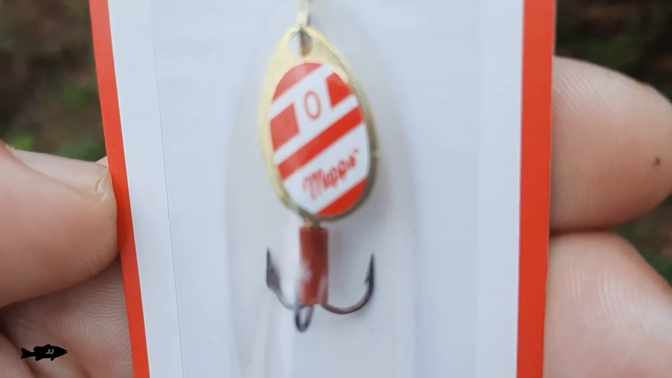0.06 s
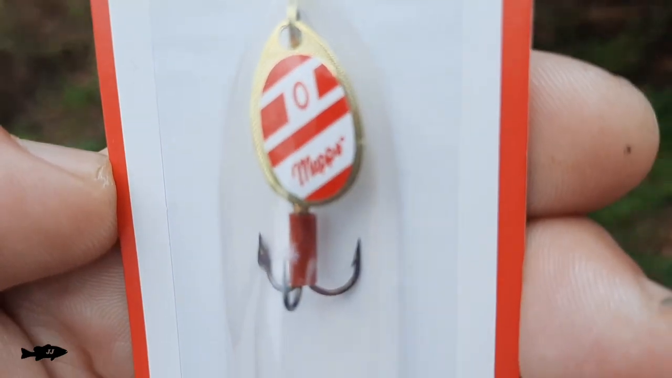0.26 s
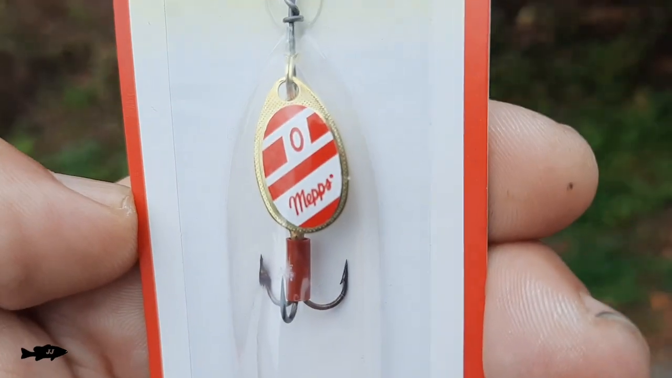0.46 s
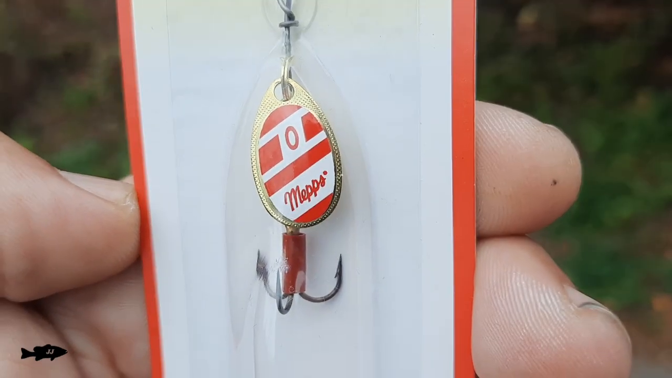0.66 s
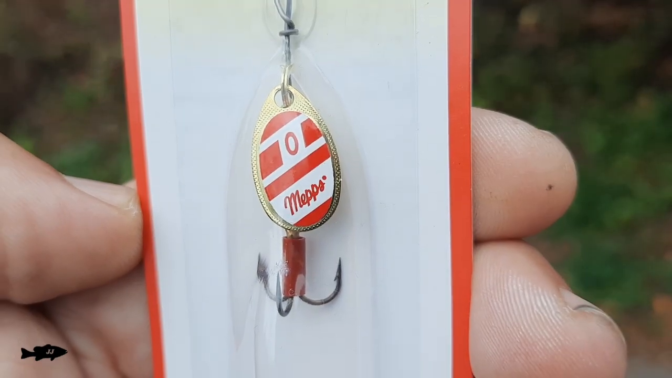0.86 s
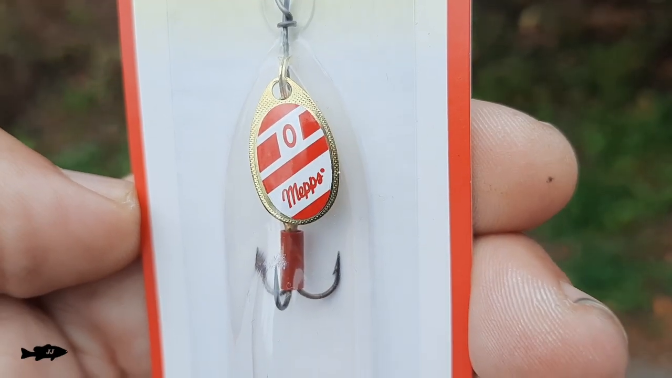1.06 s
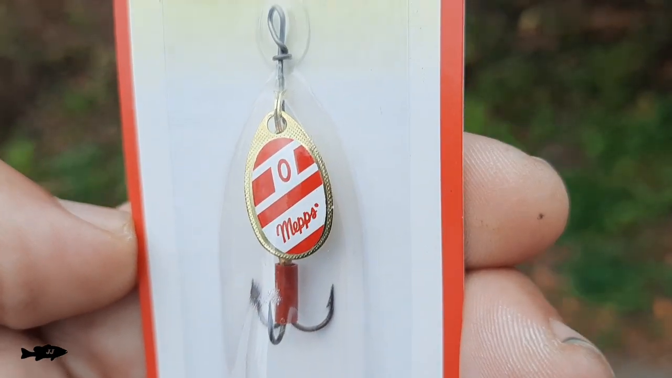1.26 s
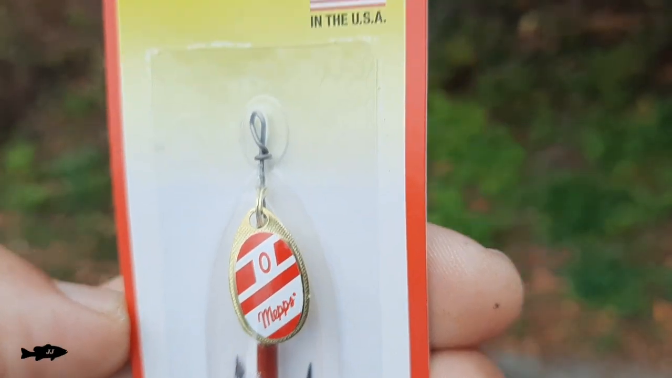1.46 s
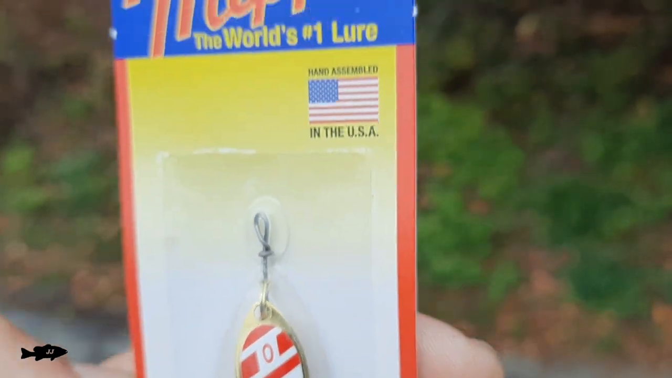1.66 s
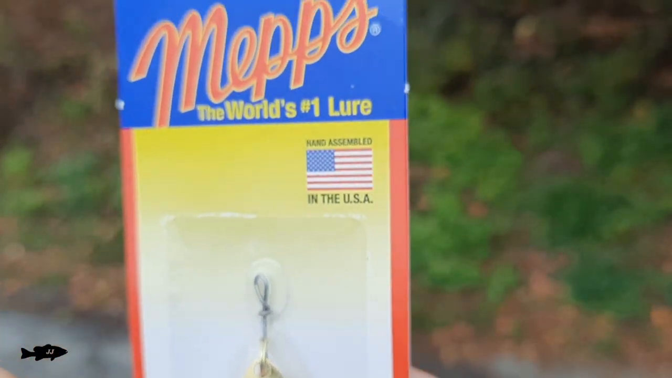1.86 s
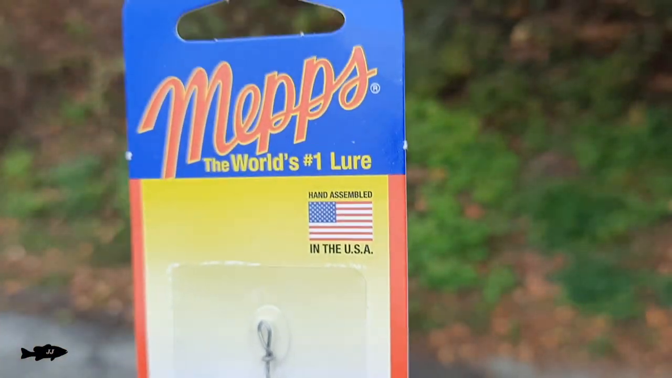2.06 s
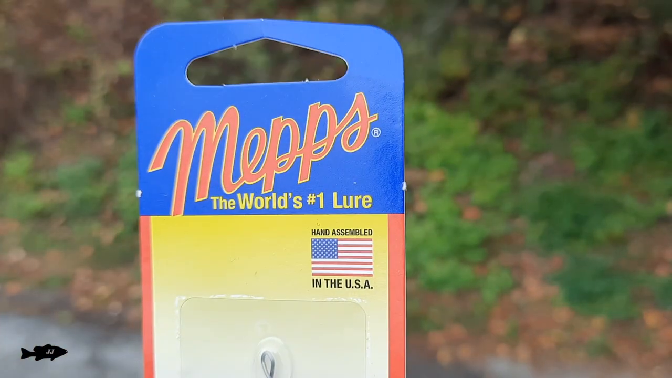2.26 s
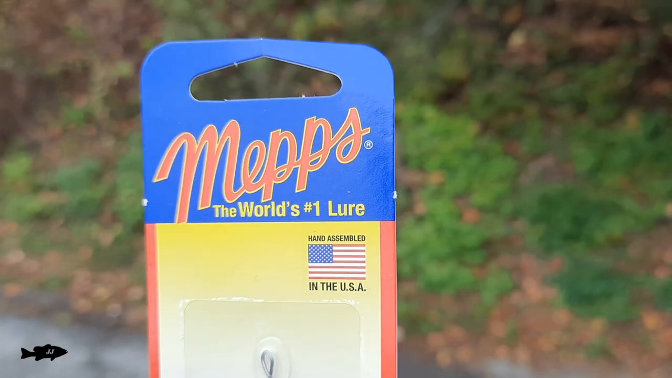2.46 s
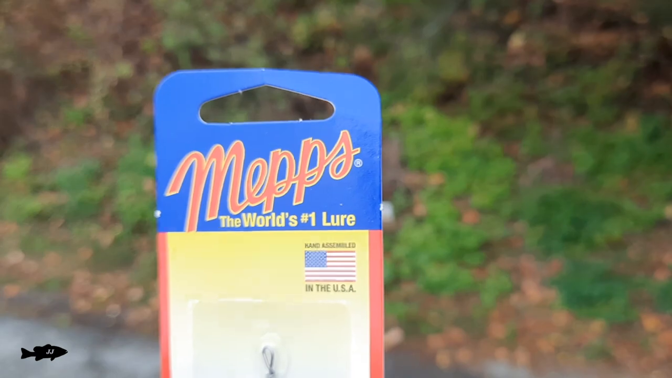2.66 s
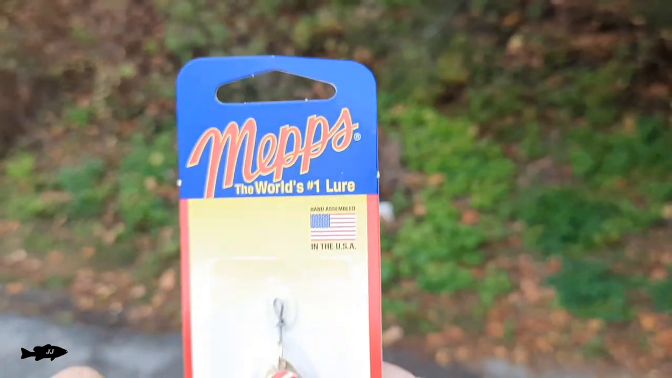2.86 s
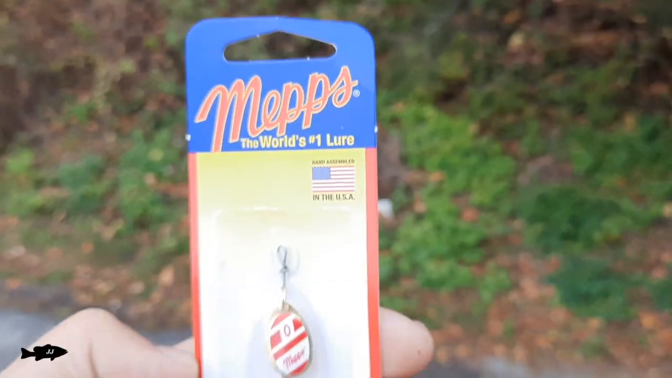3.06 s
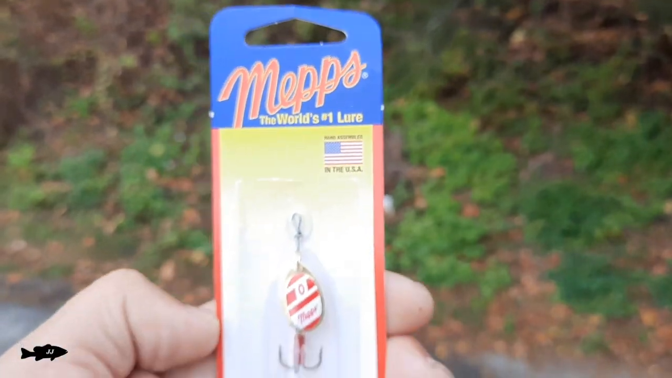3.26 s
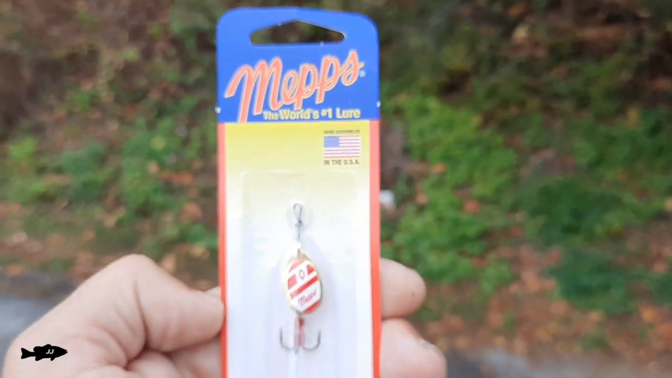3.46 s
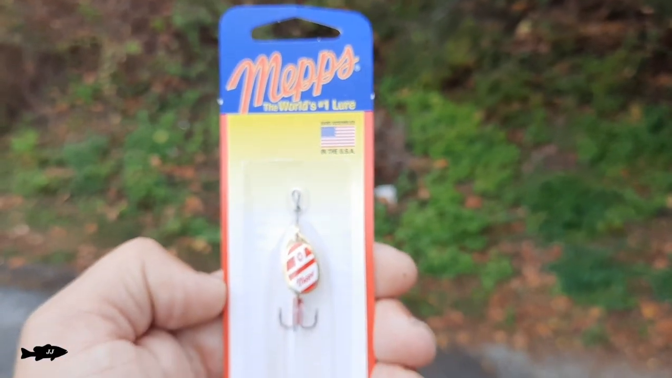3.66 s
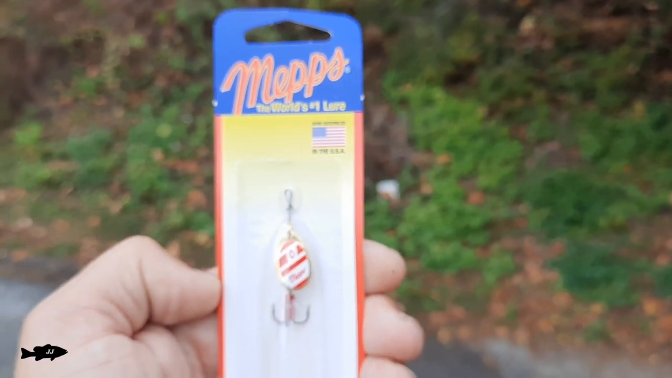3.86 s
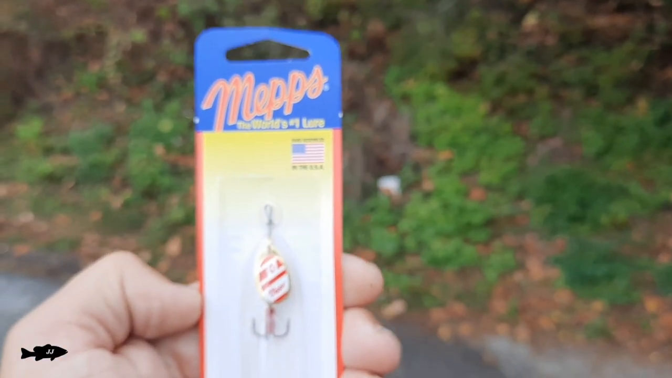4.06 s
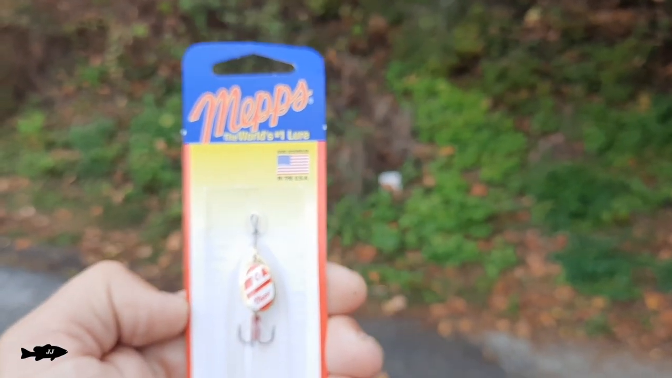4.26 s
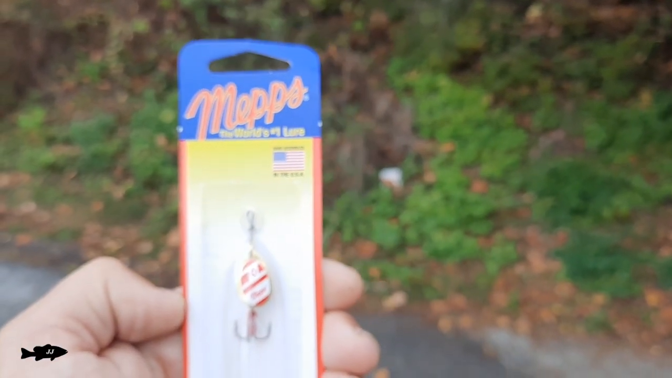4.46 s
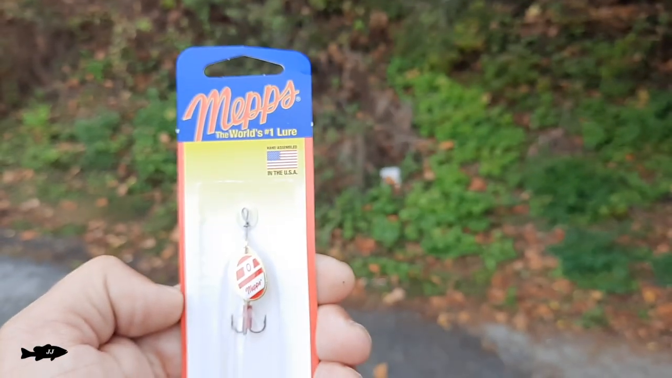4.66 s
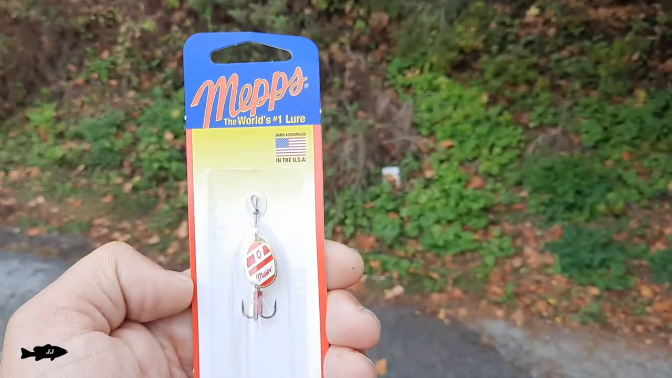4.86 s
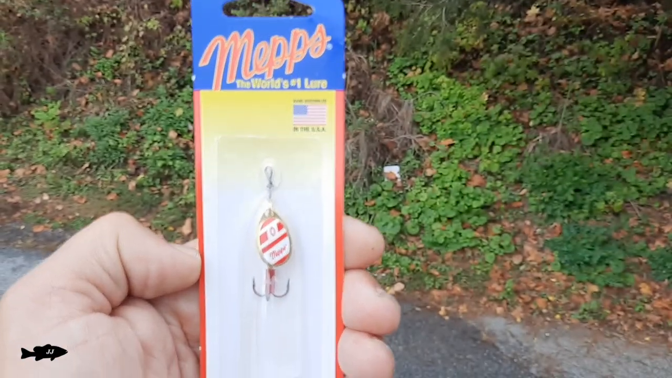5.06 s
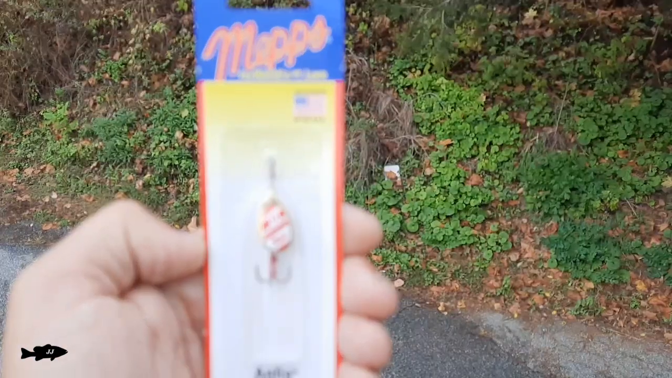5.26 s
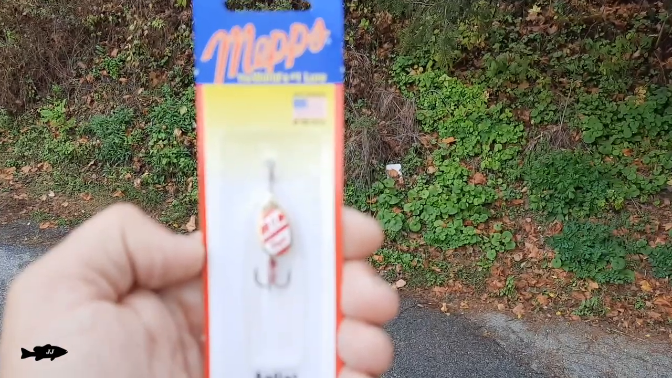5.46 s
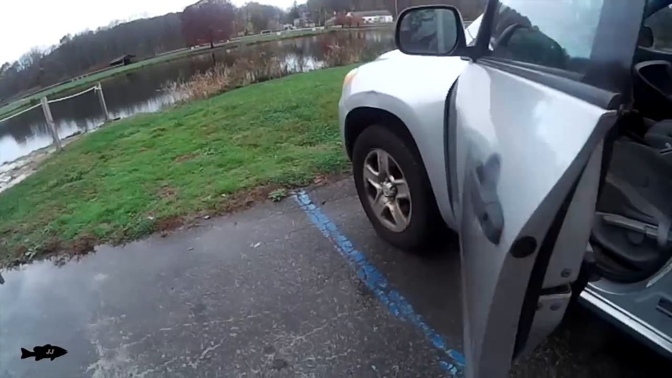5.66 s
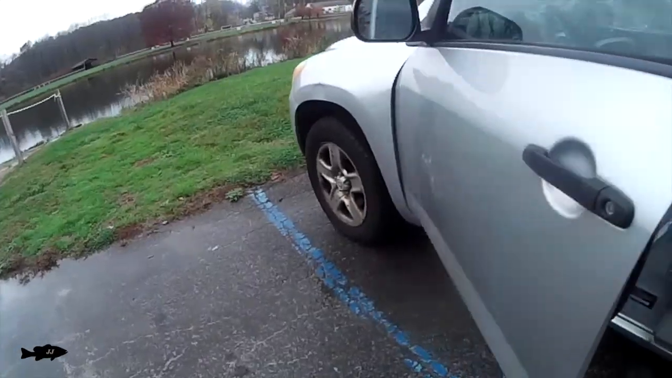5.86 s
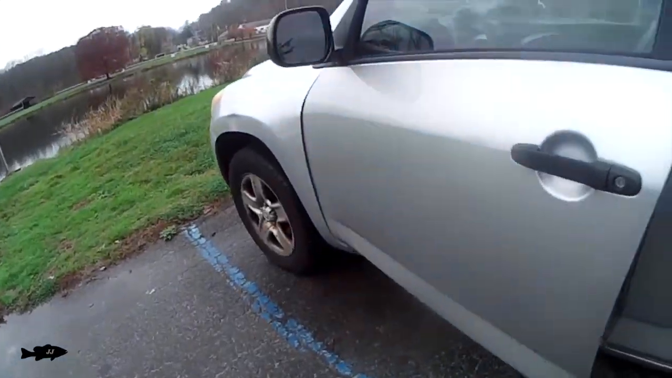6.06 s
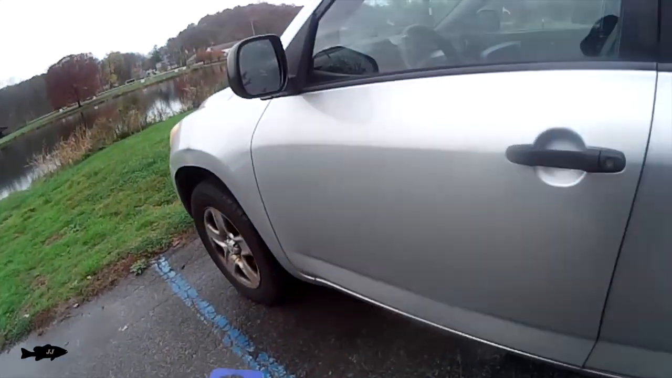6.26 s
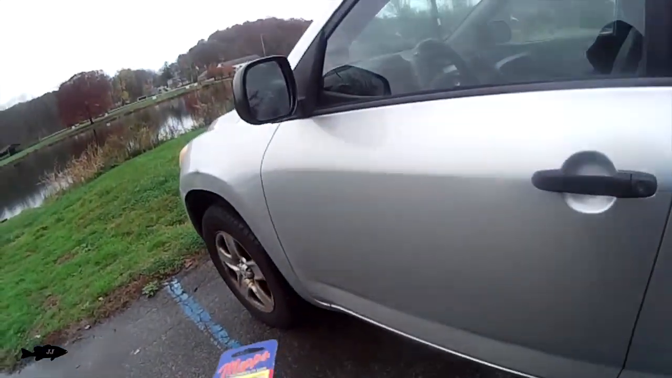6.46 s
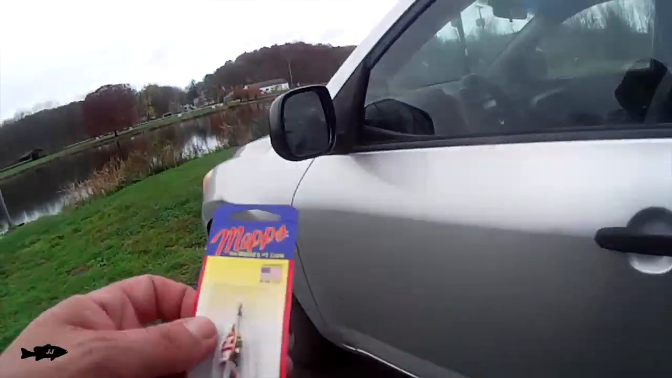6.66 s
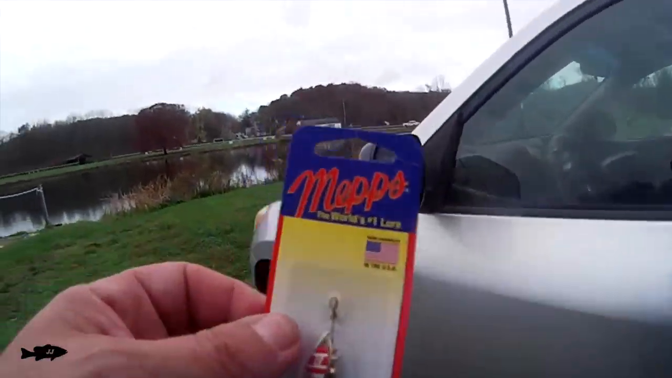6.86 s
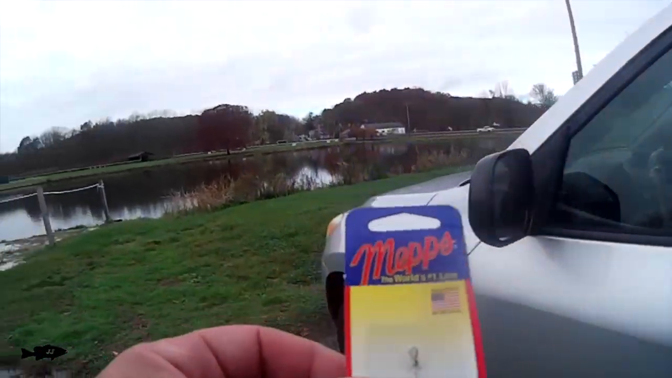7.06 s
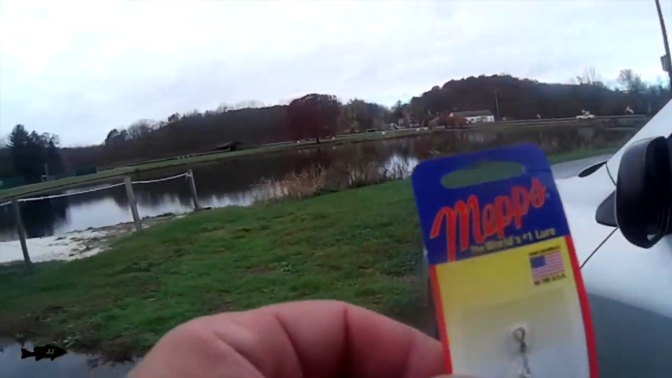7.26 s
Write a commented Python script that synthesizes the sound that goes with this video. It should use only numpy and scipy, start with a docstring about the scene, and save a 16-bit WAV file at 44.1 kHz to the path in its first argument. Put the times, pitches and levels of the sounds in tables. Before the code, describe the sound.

Tyre roar rises, passes and fades over quiet insects; abruptly, duller air, a snapping plastic packet, and one solid car door slam close by.

```python
"""Roadside pass-by, then a car door

Crickets sing at a roadside while a car passes on the right: coloured noise makes rumble, tyre roar and hiss,
blurred tones make hum, exhaust boom, drone and whine, all sinking in pitch by Doppler and a steady sag.
At SWITCH_S the scene becomes a lakeside car park through one small microphone: far traffic wash, air bumps,
a plastic packet of damped modes and stick-slip rubs, and a door shutting with knocks, clicks and panel ring."""
import sys
import numpy as np
from scipy import signal
from scipy.fft import rfft, irfft, next_fast_len
from scipy.io import wavfile
from scipy.ndimage import map_coordinates

SR = 44100
rng = np.random.default_rng(int(sys.argv[2]) if len(sys.argv) > 2 else 0)


def file_out(sig):
    """Save sig as 16-bit WAV at sys.argv[1]."""
    # one column per channel
    cols = np.atleast_2d(sig).T
    # limit, then scale
    lim = np.clip(cols, -1, 1)
    pcm = np.round(lim * 32767).astype(np.int16)
    wavfile.write(sys.argv[1], SR, pcm)


N = 322659
T = np.arange(N) / SR


def amp(db):
    """Decibels to gain."""
    return 10 ** (np.asarray(db) / 20)


def unit(x):
    """Scale to rms 1."""
    return x / np.sqrt(np.mean(x ** 2) + 1e-20)


def along(points, hz):
    """Interpolate (Hz, value) points on a log-frequency axis."""
    f, v = np.transpose(points)
    return np.interp(np.log(hz + 1), np.log(f + 1), v)


def curves(rows):
    """One value per sample for each column after the time."""
    s, *cols = np.transpose(rows)
    return [np.interp(T, s, c) for c in cols]


def wobble(knots_per_s):
    """A smooth random curve through normally distributed knots."""
    knots = rng.standard_normal(int(N * knots_per_s / SR) + 4)
    return map_coordinates(knots, [T * knots_per_s])


def filtered(x, response):
    """Multiply the spectrum of x by a function of frequency in Hz."""
    n = x.shape[-1]
    m = next_fast_len(n + SR // 4)
    return irfft(rfft(x, m) * response(np.fft.rfftfreq(m, 1 / SR)), m)[..., :n]


def noise(spectrum, size=N, tilt_db=0):
    """Noise of rms 1 with the given colour, tilted in dB per octave."""
    colour = lambda hz: amp(along(spectrum, hz) + tilt_db * np.log2(hz + 1))
    return unit(filtered(rng.standard_normal(size), colour))


def fade(t, t60):
    """Free decay, 60 dB in t60 seconds."""
    return np.exp(-np.log(1000) * t / t60)


def add(track, s, sound):
    """Mix a sound into the track from time s."""
    part = track[round(s * SR):][:len(sound)]
    part += sound[:len(part)]


def swell(start, end, attack, release):
    """A gain that rises around start, holds, and falls around end."""
    rise = 1 + np.tanh((T - start) / (2 * attack))
    fall = 1 - np.tanh((T - end) / (2 * release))
    return rise * fall / 4


def touches(rows):
    """Brief Gaussian rises of gain, one for each (s, dB, length s) row."""
    return sum(amp(db) * np.exp(-((T - s) / length) ** 2) for s, db, length in rows)


def ringing(modes, t, scatter_db):
    """Damped modes of alternating sign, their levels drawn afresh each time."""
    out = 0
    for k, (hz, db, t60) in enumerate(modes):
        level = amp(db + rng.normal(0, scatter_db))
        out = out + (-1) ** k * level * fade(t, t60) * np.sin(2 * np.pi * hz * t)
    return out


def tone(hz, width_hz, flutter_db):
    """A tone blurred by a wandering phase and a fluttering level."""
    drift = np.cumsum(rng.standard_normal(N) * np.sqrt(2 * np.pi * abs(width_hz) / SR))
    lowpass = signal.butter(2, np.clip(2.2 * width_hz, 5, 2000), fs=SR, output="sos")
    smooth = signal.sosfilt(lowpass, np.exp(1j * drift))
    carrier = np.exp(2j * np.pi * np.cumsum(hz) / SR)
    return amp(flutter_db * wobble(24.99)) * (smooth * carrier).real


SWELL_EDGE_S = 0.035


def swelling(rows, hz, flutter_db):
    """A tone that comes and goes in swells, each with its own level and blur."""
    return sum(amp(db) * swell(start, end, SWELL_EDGE_S, SWELL_EDGE_S) * tone(hz, width_hz, flutter_db)
               for start, end, db, width_hz in rows)


PASS_S, SPEED_M_PER_S = 2.4, 9


def position():
    """Metres past the microphone on a straight course at constant speed."""
    return SPEED_M_PER_S * (T - PASS_S)


CLOSEST_M = 8.14


def bearing():
    """Sine of the angle to the car: towards -1 coming, 0 abreast, towards 1 going."""
    return position() / np.hypot(position(), CLOSEST_M)


LAG_MS, LAG_SWING_MS = 0.454, 0.035  # lag abreast; swing with bearing


def from_right(x):
    """A sound from the right reaches the left microphone later."""
    lag_samples = (LAG_MS - LAG_SWING_MS * bearing()) * SR / 1000
    return np.array([map_coordinates(x, [np.arange(N) - lag_samples], order=3), x])


def scattered(y, z, unlike_hz=760):
    """Noise from all sides: two spaced microphones agree only in the bass."""
    turn = lambda hz: np.arccos(np.sinc(hz / unlike_hz)) / 2
    mid, side = filtered(np.array([y, z]), lambda hz: np.array([np.cos(turn(hz)), np.sin(turn(hz))]))
    return np.array([mid + side, mid - side])


DIRECT_SHARE, OPEN_M = 0.36, 12.2  # power share heard straight when abreast; reach of that path


def road_noise(x, y, z):
    """Of three like noises, one comes straight from the car and two are scattered by the bank."""
    share = np.clip(DIRECT_SHARE * np.exp(-(position() / OPEN_M) ** 2), 0, 1)
    return np.sqrt(share) * from_right(x) + np.sqrt(1 - share) * scattered(y, z)


# Loudness of the pass. Each row: time in seconds, tyre roar and body rumble in dB before a fixed trim.
PASS_LOUDNESS = [(0.0, -61, -68.5), (0.55, -58, -66.5), (0.95, -50.5, -55.5), (1.4, -42.5, -48.5),
                 (1.75, -39.5, -50), (2.0, -38.0, -45), (2.25, -33, -40.5), (2.62, -35.5, -41.5),
                 (2.9, -37.0, -44), (3.25, -38.5, -44.5), (3.65, -40.5, -46), (4.15, -40, -47.5),
                 (4.65, -44, -55), (5.6, -48, -60)]
# Colours of body rumble, tyres from the front, tyres from the rear, hiss.
# Each row: frequency in Hz, relative density in dB per Hz.
RUMBLE_COLOUR = [(15, -42), (35, -25), (65, -1), (100, -1), (135, -1), (172, 0.5), (220, -3), (320, -2),
                 (600, -8), (2000, -86)]
TYRE_FRONT_COLOUR = [(100, -29), (250, -7), (330, 0.5), (470, -3), (610, -7.5), (790, 0), (930, -5),
                     (1150, -8.5), (1700, -10), (2150, -13.5), (3200, -28), (5000, -36.5), (12000, -48)]
TYRE_REAR_COLOUR = [(100, -50), (260, -0.5), (420, 4), (620, -10.5), (780, 5.5), (920, 0), (1150, 4),
                    (1400, -8), (1650, -5.5), (2700, -16), (3200, -22), (5000, -36.5), (9500, -54),
                    (15000, -48)]
HISS_COLOUR = [(800, -44), (2500, 11.5), (4200, 5.5), (5200, -2.5), (6250, 0), (7200, -6.5), (8400, -5),
               (9400, -16), (10800, -11.5), (13000, -19), (15500, -30)]
# Microphone mismatch. Each row: frequency in Hz, left minus right in dB.
MIC_MISMATCH = [(60, -2.5), (130, 0), (290, -1), (640, 5.5), (1410, -2.5), (3100, 0.5), (6820, 4.5),
                (15000, -1)]
REAR_AT_M, REAR_OVER_M = 3.8, 3.7  # centre and scale of the front-to-rear crossfade
HISS_PEAK_M, HISS_REACH_M = 1.3, 2  # hiss peaks this far past the microphone


def passing_car():
    """Rumble, roar and hiss follow the pass; hiss peaks just past it, roar shifts to its rear colour."""
    roar_db, rumble_db = curves(PASS_LOUDNESS)
    rear = (1 + np.tanh((position() - REAR_AT_M) / (2 * REAR_OVER_M))) / 2
    close = 1 / (1 + ((position() - HISS_PEAK_M) / HISS_REACH_M) ** 2)
    surface_db = .7 * wobble(8.2)  # uneven asphalt
    rumble = amp(rumble_db + 2.15 + 0.71 * wobble(7))
    roar = amp(roar_db + 0.3 + surface_db)
    hiss = amp(roar_db - 18.5 + 4.2 * close - 2.85 * rear + surface_db + 0.63 * wobble(30))

    def rush():
        tyres = np.sqrt(1 - rear) * noise(TYRE_FRONT_COLOUR) + np.sqrt(rear) * noise(TYRE_REAR_COLOUR)
        return rumble * noise(RUMBLE_COLOUR) + roar * tyres + hiss * noise(HISS_COLOUR)

    car = road_noise(rush(), rush(), rush()) + car_tones()
    return filtered(car, lambda hz: amp(along(MIC_MISMATCH, hz) * np.array([[.5], [-.5]])))


# Swells of tread hum, exhaust boom and engine drone.
# Each row: start in seconds, end in seconds, level in dB before blur and flutter, blur width in Hz.
HUM_SWELL_ROWS = [(2.003, 2.28, -32.5, 23.4), (2.42, 2.955, -37, 21.4), (3.05, 3.5, -45, 10.4),
                  (3.55, 4.54, -40, 0.61), (4.58, 5.7, -51.5, 1.5)]
BOOM_SWELLS = [(.88, 1.55, -56.5, 31), (1.83, 2.3, -44.5, 8.5), (2.45, 2.7, -39.5, 12),
               (2.92, 3.48, -47.5, 3.9)]
DRONE_SWELLS = [(2.0, 4.3, -53, 12.1), (4.72, 5.25, -51.5, 6)]
HUM_HZ, SAG_HZ_PER_S = 343, 2.4  # hum when abreast, and its steady sag
SOUND_M_PER_S = 343


def car_tones():
    """Tread hum, a moan on the approach, exhaust boom, drone and thin whine share one Doppler law and sag."""
    sag = 1 - SAG_HZ_PER_S * (T - PASS_S) / HUM_HZ
    pitch = sag / (1 + bearing() * SPEED_M_PER_S / SOUND_M_PER_S)
    hum = swelling(HUM_SWELL_ROWS, HUM_HZ * pitch, flutter_db=1.5)
    moan_gain = amp(-38.5) * swell(1.42, 1.83, attack=0.047, release=0.11)
    moan = moan_gain * tone(412 * pitch, width_hz=90, flutter_db=1.5)
    exhaust = swelling(BOOM_SWELLS, 68.5 * pitch, flutter_db=4.5)
    drone = swelling(DRONE_SWELLS, 177 * pitch, flutter_db=3.5)
    whine_gain = amp(-69) * swell(2.0, 2.7, attack=.04, release=0.15)
    whine = whine_gain * tone(8250 * pitch, width_hz=200, flutter_db=1.0)
    return from_right(hum + moan) * amp([[.6], [-.6]]) + from_right(exhaust + drone + whine)


# Roadside wash. Each row: frequency in Hz, relative density in dB per Hz.
FAR_TRAFFIC_COLOUR = [(15, -38), (25, -12), (79, 1), (309, -5), (354, -12), (604, -15), (790, 0.5),
                      (1150, -5.5), (1960, -9.5), (5140, -36.5), (5880, -34), (9270, -47), (12400, -37),
                      (15000, -55)]


def far_traffic():
    """A steady wash from distant roads, arriving from all sides."""
    return amp(-57.5) * scattered(noise(FAR_TRAFFIC_COLOUR), noise(FAR_TRAFFIC_COLOUR))


RATE_WANDER_SHARE, STROKE_WANDER_DB = .005, 1.5


def cricket(hz, rate, stroke_s, duty, sweep_hz, rough_hz):
    """Each wing stroke, one of them centred on stroke_s, rings one short note that arches in pitch."""
    strokes = np.cumsum(rate * (1 + RATE_WANDER_SHARE * wobble(3.3))) / SR
    phase = (strokes - np.interp(stroke_s, T, strokes) + duty / 2) % 1
    u = np.clip(phase / duty, 0, 1)  # progress through the stroke
    pitch = hz - sweep_hz * (2 * u - .85) ** 2 + rough_hz * wobble(250)
    notes = np.sin(np.pi * u) * np.sin(2 * np.pi * np.cumsum(pitch) / SR)
    return unit(notes) * amp(STROKE_WANDER_DB * wobble(16))


# Tree cricket trills. Each row: start in seconds, end in seconds, level in dB, time of one stroke in seconds.
TREE_TRILLS = [(-.2, 0.305, -81.5, .177), (.32, .41, -81, 0.34), (4.957, 5.04, -72, 5.019),
               (5.04, 5.46, -68, 5.229)]
TRILL_ATTACK_S, TRILL_RELEASE_S = 0.011, .008
TREE_STROKES_PER_S, NEAR_STROKES_PER_S, FAR_STROKES_PER_S = 23.8, 10.95, (10.2, 12.4)
NEAR_DB, FAR_DB = -79, -82.5  # FAR_DB: the first far one; the second is 4 dB lower
LEAVES_DB = -5.5  # scatter of the tree and near crickets


def crickets():
    """A tree cricket trills in bursts; ground crickets tick higher up, the far ones smeared by undergrowth."""
    tree = 0
    for start, end, db, stroke_s in TREE_TRILLS:
        gain = amp(db) * swell(start, end, TRILL_ATTACK_S, TRILL_RELEASE_S)
        tree = tree + gain * cricket(hz=3494, rate=TREE_STROKES_PER_S, stroke_s=stroke_s, duty=.72,
                                     sweep_hz=29.9, rough_hz=15)
    near = cricket(hz=6470, rate=NEAR_STROKES_PER_S, stroke_s=4.434, duty=0.25, sweep_hz=604, rough_hz=40)
    near = near * amp(NEAR_DB) * swell(2.3, 5.4, attack=.3, release=0.35)
    far = sum(amp(-4 * k) * cricket(hz=6035, rate=rate, stroke_s=0.98, duty=.4, sweep_hz=278, rough_hz=50)
              for k, rate in enumerate(FAR_STROKES_PER_S))
    far = far * amp(FAR_DB) * swell(0.34, 6.3, attack=0.46, release=.3)
    t = np.arange(SR // 4) / SR
    leaves = rng.standard_normal((2, len(t))) * fade(t, 0.06)
    leaves = leaves / np.linalg.norm(leaves[0])
    distant = far + amp(LEAVES_DB) * (tree + near)
    return tree + near + signal.fftconvolve(distant[None], leaves, axes=1)[:, :N]


# Colours of the lakeside wash and of the air bumps. Each row: frequency in Hz, relative density in dB per Hz.
LAKESIDE_COLOUR = [(15, -39), (25, -16), (59, -3.5), (193, -3.5), (233, 0), (267, -5), (368, -5.5),
                   (537, -12.5), (597, -11.5), (1750, -15.5), (2170, -27), (2550, -26), (3620, -32),
                   (12500, -36.5), (15500, -46)]
AIR_BUMP_COLOUR = [(10, -12), (28, 7.5), (60, -5), (110, -8), (200, -18), (600, -58), (2000, -90)]
# Air bumps on the moving microphone. Each row: centre in seconds, level in dB, length in seconds.
AIR_BUMPS = [(6.62, -51, 0.052), (6.812, -51, 0.024), (6.885, -50, 0.053), (7.04, -60, .04),
             (7.27, -54, 0.075)]


def lakeside_air():
    """Far traffic and faint hiss, with air bumping the microphone."""
    far = amp(-54.0 + 0.2 * wobble(3.0)) * noise(LAKESIDE_COLOUR)
    return far + touches(AIR_BUMPS) * noise(AIR_BUMP_COLOUR)


# Stiff plastic modes. Each row: frequency in Hz, relative level in dB before the snap's tilt, t60 in seconds.
PACKET_MODES = [(1670, 4, 0.014), (2020, -20, 0.013), (2700, -9, 0.014), (3930, -12, 0.013),
                (5360, -20, 0.011), (8400, -32, 0.0082)]
# Packet snaps. Each row: start in seconds, level in dB before tilt and rise, brightness in dB per octave.
PACKET_SNAPS = [(5.676, -40, -2.5), (5.965, -48, 1), (6.7075, -41, -1), (6.732, -47, 8.5),
                (6.8047, -30, -3)]
# Colour of snaps and rubs. Each row: frequency in Hz, relative density in dB per Hz.
PLASTIC_COLOUR = [(600, -28), (1300, 4), (1750, 14), (2300, -2), (3200, -2), (3900, -5), (5500, -12),
                  (8200, -11.5), (10000, -29), (14000, -37)]


def packet():
    """Stiff plastic snaps and rings for a moment, or scuffs under the fingers."""
    out, t = np.zeros(N), np.arange(SR // 10) / SR
    lowest_hz = PACKET_MODES[0][0]
    for s, db, bright_db in PACKET_SNAPS:
        ring = sum(amp(level + bright_db * np.log2(hz / lowest_hz)) * fade(t, t60) * np.sin(2 * np.pi * hz * t)
                   for hz, level, t60 in PACKET_MODES)
        crack = noise(PLASTIC_COLOUR, size=len(t), tilt_db=bright_db) * fade(t, 0.04)
        crack = amp(-10.0 + bright_db) * crack
        add(out, s, amp(db) * (ring + crack) * (1 - np.exp(-t / 0.00043)))
    return out + rubs()


# Finger rubs. Each row: centre in seconds, scuff level in dB, length in seconds, singing pitch in Hz.
FINGER_RUBS = [(5.69, -62, .005, 1750), (6.695, -60, 0.02, 2950), (6.719, -54, 0.0055, 4100),
               (6.781, -61, 0.005, 4050), (6.997, -63, 0.007, 3800), (7.024, -53, 0.014, 3900)]
SLIPS_PER_S, SING_WIDTH_HZ, SING_DB = 5000, 450, -4.5  # SING_DB: relative to the scuff


def rubs():
    """Fingers stick and slip on the packet: a fine crackle that sings at the pitch of the spot they touch."""
    out = np.zeros(N)
    for s, db, length, sing_hz in FINGER_RUBS:
        slips = rng.standard_normal(N) * (rng.random(N) < SLIPS_PER_S / SR)
        scuff = unit(filtered(slips, lambda hz: amp(along(PLASTIC_COLOUR, hz))))
        resonance = lambda hz: 1j * hz / (sing_hz ** 2 - hz ** 2 + 1j * hz * SING_WIDTH_HZ)
        sing = unit(filtered(slips, resonance))
        out += touches([(s, db, length)]) * (scuff + amp(SING_DB) * sing)
    return out


# Door contacts: seal, latch, striker, frame, seal squeezed, striker again, rebound, latch settling, rattle.
# Each row: start in seconds, panel, knock and metal click drive in dB, rise in seconds.
DOOR_CONTACTS = [(6.290, -25.5, -26, -36, 0.0016), (6.304, -49, -45, -29.5, 0.0018),
                 (6.3135, -18, -9.5, -23.5, 0.0008), (6.3234, -25, -21, -33, 0.00067),
                 (6.338, -20, -26, -36, 0.0014), (6.3432, -14.5, -6, -24.5, 0.00081),
                 (6.379, -16.5, -23, -31, 0.0031), (6.390, -23, -20, -37, .001),
                 (6.461, -28, -34, -37, 0.0067)]
# Door panel and window modes, then the dead knock of striker and frame.
# Each row: frequency in Hz, relative level in dB, t60 in seconds.
PANEL_MODES = [(125, -1, 0.36), (172, -0.5, 0.25), (202, -3.5, 0.3), (266.6, -0.5, 0.34),
               (293.6, 0.5, 0.32), (344, 0, 0.38), (357, -6, 0.34), (382, -9, 0.51), (445, -6, 0.33),
               (465, -5.5, 0.32), (494, -7, .3), (522, 0.5, 0.21), (646, -6, 0.23), (718, -7, 0.22),
               (838, -11.5, 0.19), (1055, -9, 0.36), (1217, -14, .3), (1660, -10, 0.16), (1763, -6.5, 0.2)]
KNOCK_MODES = [(78, -7.5, 0.053), (216, -5, 0.061), (390, 0, 0.041), (494, -2, .04), (787, -6, 0.032),
               (1107, -10.5, 0.024), (1630, -6.5, 0.024), (2074, -11.5, 0.016), (2530, -16, .016)]
# Latch click colour. Each row: frequency in Hz, relative density in dB per Hz.
LATCH_COLOUR = [(400, -16), (1300, 11.5), (1800, 16), (2600, 11), (3200, 0), (4200, 4.5), (6000, -9.5),
                (8300, -15.5), (9600, -22), (12000, -20), (15000, -52)]
CRACK_T60_S, JINGLE_DB, JINGLE_T60_S = 0.028, -5, 0.14  # latch crack; jingle inside the door
CHATTER_DB, CHATTER_PER_S = 4.5, 260  # roughness and speed of the loose parts


def door():
    """Every contact knocks, cracks, sets loose parts chattering and rings the panel; cabin air heaves once."""
    out, t = np.zeros(N), np.arange(SR) / SR
    for s, panel_db, knock_db, click_db, rise in DOOR_CONTACTS:
        ring = amp(-9.5) * ringing(PANEL_MODES, t, scatter_db=1) + amp(-5.0) * shell_ring(t)
        knock = ringing(KNOCK_MODES, t, scatter_db=0)
        chatter = unit(amp(CHATTER_DB * wobble(CHATTER_PER_S)))[:SR]
        jingle = amp(JINGLE_DB) * chatter * fade(t, JINGLE_T60_S)
        click = noise(LATCH_COLOUR, size=SR) * (fade(t, CRACK_T60_S) + jingle)
        hit = amp(panel_db) * ring + amp(knock_db) * knock + amp(click_db) * click
        add(out, s, hit * (1 - np.exp(-t / rise)))
    heave = cabin_push(t, hz=25.8, db=-15, t60=0.31) + cabin_push(t, hz=51.7, db=-19, t60=0.43)
    add(out, 6.312, heave)
    return out


# Car body colour. Each row: frequency in Hz, relative density in dB per Hz.
SHELL_COLOUR = [(20, -9), (85, 1), (160, 3), (480, 2), (750, -6.5), (1200, -14.5), (1370, -20), (1650, -9),
                (2100, -26), (2700, -26), (3200, -36.5), (4300, -41), (7000, -56), (14000, -67)]
# Car body decay. Each row: frequency in Hz, t60 in seconds.
SHELL_T60 = [(40, 0.34), (300, 0.43), (700, 0.41), (2000, 0.33), (5000, 0.51), (12000, 0.87)]


def shell_ring(t):
    """The car body's many close modes as noise, each band dying at its own speed."""
    hz, s, z = signal.stft(noise(SHELL_COLOUR, size=len(t)), SR, nperseg=512)
    decay = fade(s, along(SHELL_T60, hz)[:, None])
    return signal.istft(z * decay, SR, nperseg=512)[1][:len(t)]


def cabin_push(t, hz, db, t60):
    """Air squeezed into the cabin swings slowly out again: a damped sine."""
    return amp(db) * np.sin(2 * np.pi * hz * t) * fade(t, t60)


SMALL_MIC_TOP_HZ, SMALL_MIC_LIMIT = 14100, .51  # limit in full-scale amplitude


def small_microphone(x, hardness=8):
    """One narrow-band channel that flattens the loudest peaks."""
    x = filtered(x, lambda hz: hz < SMALL_MIC_TOP_HZ)
    return x / (1 + np.abs(x / SMALL_MIC_LIMIT) ** hardness) ** (1 / hardness)


SWITCH_S = 5.617


def scene():
    """The roadside in stereo, then the car park in mono."""
    roadside = passing_car() + far_traffic() + crickets()
    car_park = small_microphone(lakeside_air() + packet() + door())
    return np.where(T < SWITCH_S, roadside, car_park)


TOP_HZ = 15700


def record(dry):
    """Nothing is kept above the band limit."""
    return filtered(dry, lambda hz: hz < TOP_HZ)


dry = scene()
out = record(dry)
file_out(out)
```